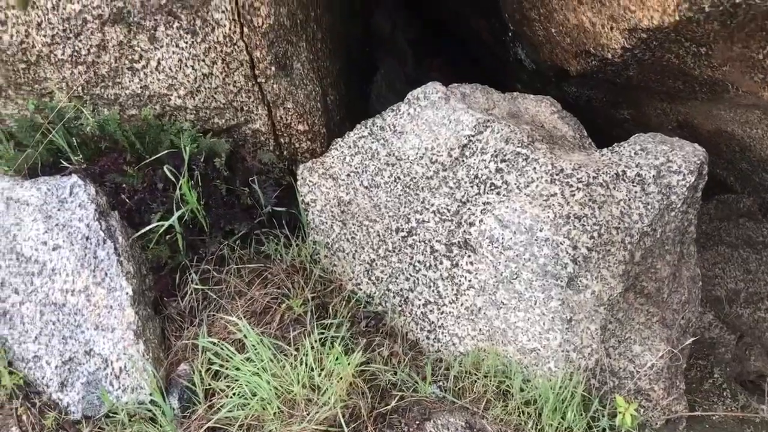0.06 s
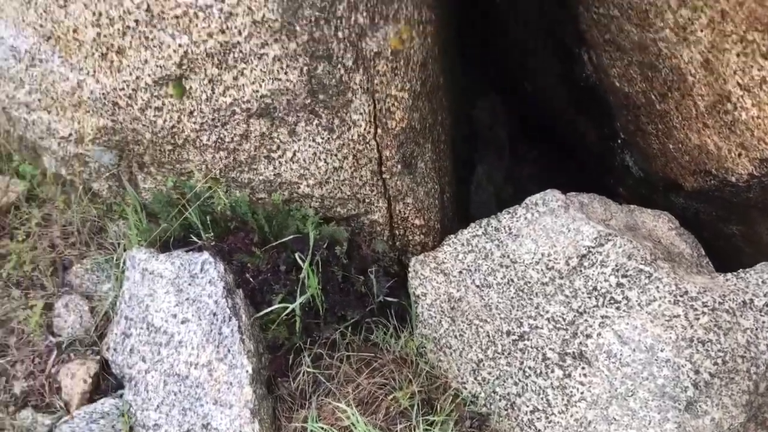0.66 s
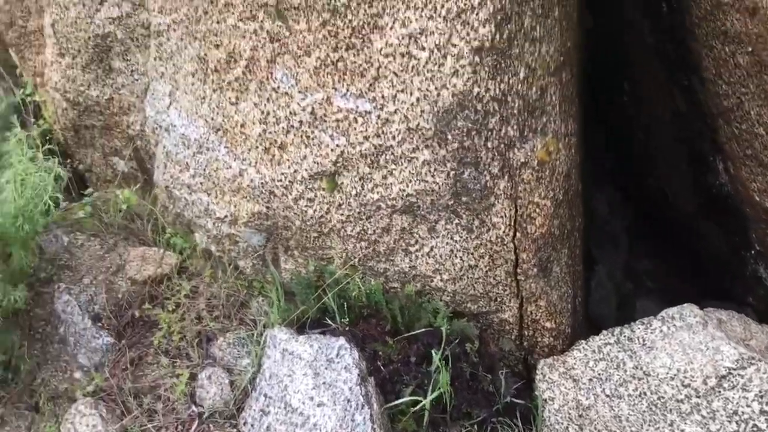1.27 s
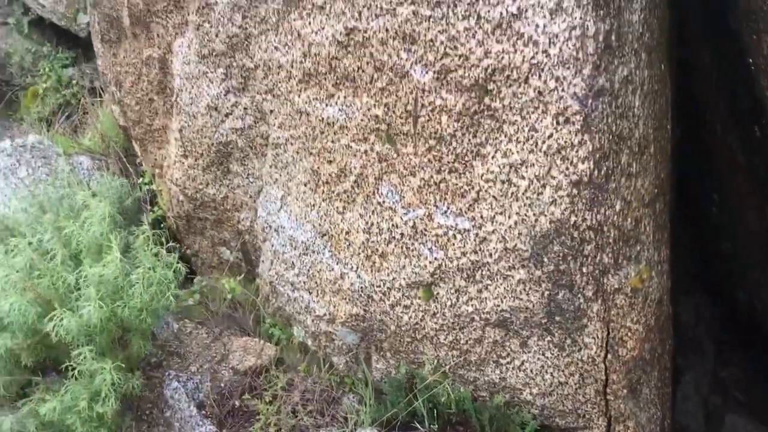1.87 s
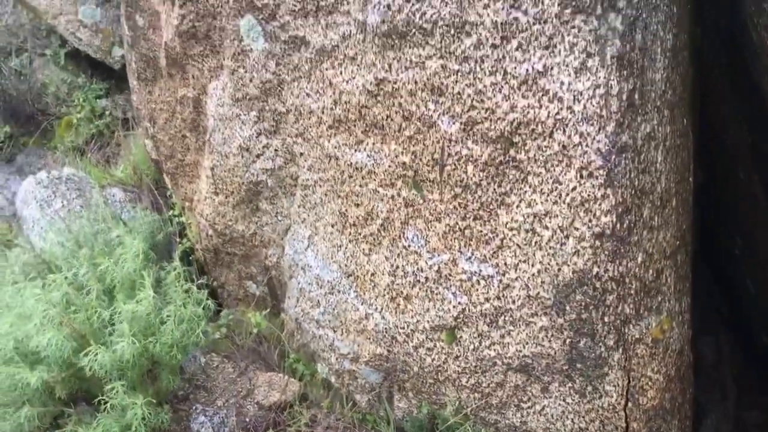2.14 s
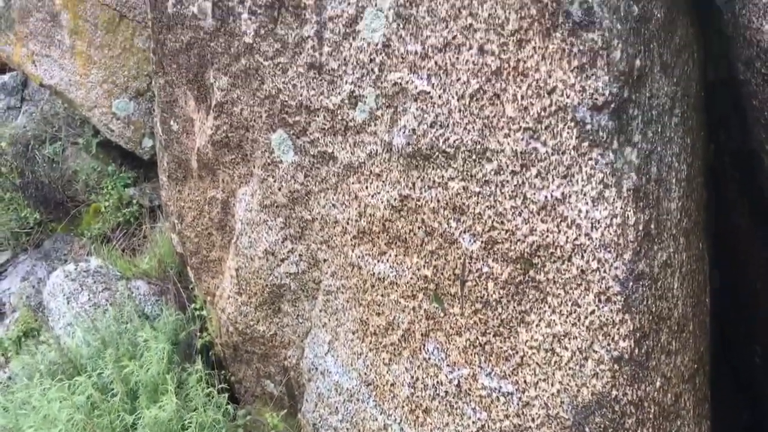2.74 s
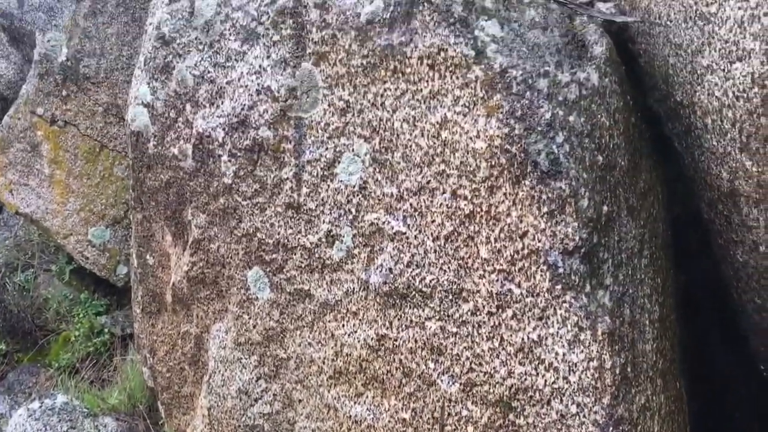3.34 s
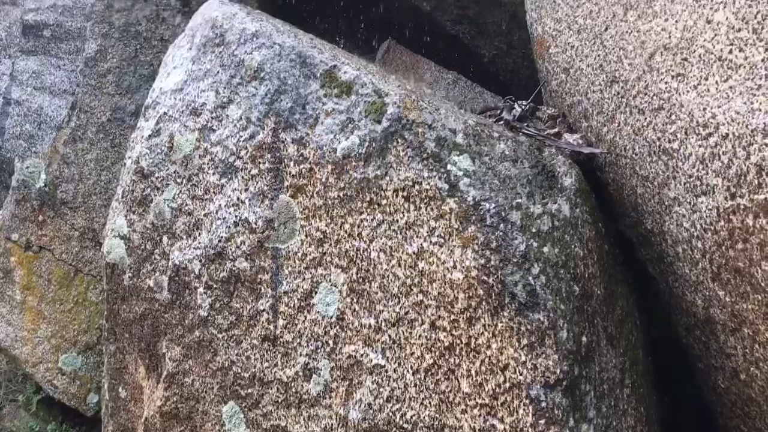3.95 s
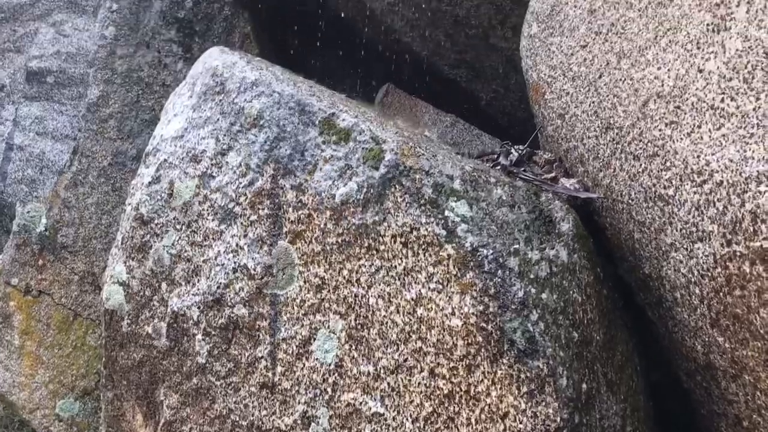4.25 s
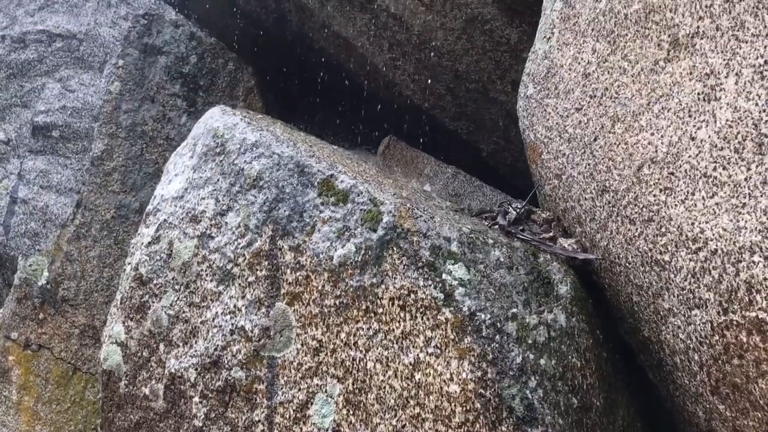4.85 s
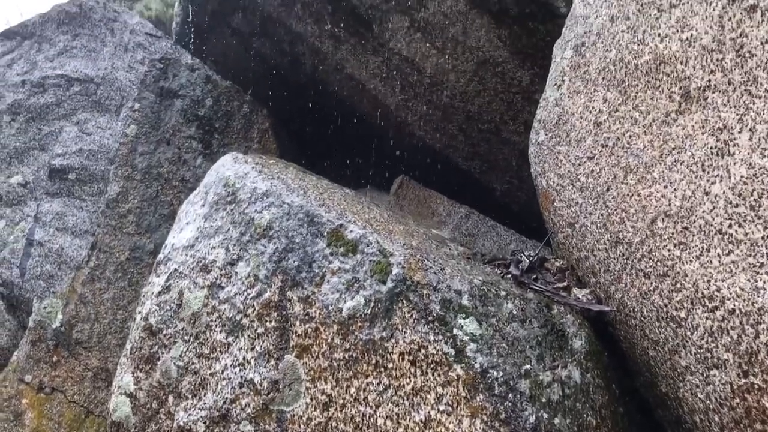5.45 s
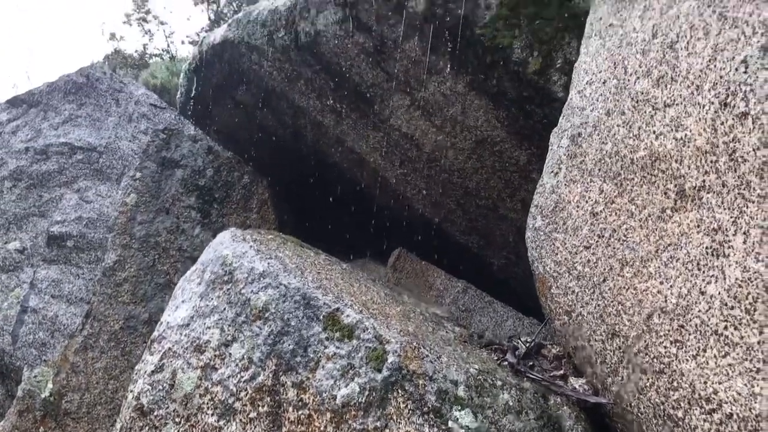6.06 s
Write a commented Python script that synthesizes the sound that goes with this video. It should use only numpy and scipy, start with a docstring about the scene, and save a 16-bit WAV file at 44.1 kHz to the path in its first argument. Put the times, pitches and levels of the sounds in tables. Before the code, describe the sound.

Water drips quickly and unevenly from an overhanging boulder, smacking on rock and wet ground over a fine patter outdoors.

```python
"""Water drips fast and unevenly from an overhanging boulder onto granite and wet ground.
Each near drop is a tiny smack followed by a short spray. Fat drops plop into wet hollows,
duller splatters and soft thuds land on the earth, and one trapped bubble rings.
Countless small drops patter behind them, the rock faces echo faintly, and the outdoor air rumbles low."""
import sys
import numpy as np
from scipy import signal
from scipy.fft import rfft, irfft, next_fast_len
from scipy.io import wavfile

SR = 44100
rng = np.random.default_rng(int(sys.argv[2]) if len(sys.argv) > 2 else 0)


def bounce(signal):
    """Save signal as a 16-bit WAV file at the path given by the first command-line argument."""
    frames = np.transpose(np.atleast_2d(signal))
    limited = np.clip(frames, -1, 1)
    pcm = np.round(limited * 32767).astype(np.int16)
    wavfile.write(sys.argv[1], SR, pcm)


N = 269451

TOUCH_S = 0.0008   # a drop first touches this long before it smacks
# How loud the far patter on rock is. Each row: time in seconds, level in dB.
ROCK_PATTER_LEVELS = [(0.0, -53.5), (0.36, -51), (0.5, -52), (0.75, -48.5), (1.0, -50), (1.15, -49.5),
                      (1.42, -48.5), (1.7, -49), (1.79, -50), (2.09, -47), (2.7, -48), (3.1, -48),
                      (3.95, -47), (4.15, -44.5), (4.44, -49.5), (4.6, -44.5), (4.82, -49.5), (4.98, -44.5),
                      (5.65, -47), (5.9, -48.5), (6.11, -45)]


def rock_drips():
    """Near drops hit the granite with a bright smack and a spray."""
    # Each row: start in seconds, level in dB, pitch in Hz, width in octaves, second pitch in Hz, its level in
    # dB compared with the first, relative spray level in dB. The narrow row at 0.8593 s is the trapped bubble
    # ringing, not a drop on the granite.
    main_drops = [(0.048, -40, 6530.0, 0.68, 14000.0, -3, -2.0),
                  (0.0548, -40, 3300.0, 0.32, 5400.0, -6.0, -12), (0.1884, -34, 6040, 0.3, 4130, -9.0, -5),
                  (0.2673, -41.5, 7770.0, 0.22, 13400.0, 0.0, -12.0),
                  (0.2706, -41, 13380.0, 0.2, 6100.0, -9.0, -11.0),
                  (0.2917, -40, 3880.0, 0.54, 5200.0, -10, -10.0), (0.3506, -39, 4930, 0.67, 5200, 2, -4.0),
                  (0.4144, -34.5, 13170.0, 0.42, 7900.0, -6.0, 0),
                  (0.4301, -40, 2800.0, 0.64, 1810, -12, -13.0),
                  (0.5428, -36.5, 6520.0, 0.2, 13800.0, -8, -11),
                  (0.6055, -34.0, 6700, 0.62, 12300.0, -6, -1),
                  (0.6912, -43, 4490.0, 0.41, 13300.0, -11, -3.0),
                  (0.7312, -37.5, 6900.0, 0.22, 9600.0, -19, -9),
                  (0.7598, -38.0, 12800.0, 0.87, 6200.0, -3.0, -2),
                  (0.8593, -38, 4340, 0.14, 2300.0, -12.0, -12),
                  (0.8732, -40, 8570.0, 0.32, 14000.0, 3, -11),
                  (0.9139, -29, 3750, 0.44, 7700.0, -9.0, -9.0),
                  (1.0489, -34.5, 6100, 0.29, 3700.0, -10.0, -11),
                  (1.0829, -37.0, 6710.0, 0.2, 8500.0, -7, -12.0),
                  (1.1106, -36, 6420.0, 0.22, 2300.0, -7, -8.0),
                  (1.1285, -32, 6700.0, 0.36, 4430, -8.0, -4), (1.1653, -34, 6560.0, 1.97, 7700.0, 1, -14),
                  (1.2328, -38, 5220.0, 0.24, 3800.0, -7, 0.0),
                  (1.2446, -35.5, 6930.0, 0.45, 2200.0, -9.0, 0),
                  (1.3775, -39, 6200, 0.34, 8100.0, -13, -3.0),
                  (1.4867, -36.0, 13500.0, 0.2, 9400.0, -5.0, 1),
                  (1.6491, -30.5, 5930.0, 0.25, 8300.0, -13.0, -9.0),
                  (1.7174, -34.5, 6300, 0.29, 8900.0, -6.0, 0.5),
                  (1.8123, -33.5, 3770, 0.54, 4300.0, -5, -4),
                  (1.8732, -32.5, 11690.0, 0.59, 5900.0, -3, -10),
                  (1.8818, -30.5, 5820.0, 0.42, 8000.0, -8.0, -3),
                  (1.8862, -39, 6040.0, 0.51, 14000.0, -5, -8),
                  (1.9147, -37, 8560.0, 0.51, 4500.0, -6.0, -4),
                  (1.9595, -39.0, 12810.0, 0.43, 8700.0, -9, 0.0), (1.9905, -35, 6900, 0.2, 5300.0, -1, -9),
                  (2.003, -34, 3770, 0.44, 13100.0, -5.0, 0), (2.0727, -29, 3550, 0.51, 6500, -13, -2),
                  (2.1053, -37, 6300, 0.23, 7500.0, -5, -6.0), (2.1103, -30.5, 3000, 0.37, 4600.0, -4, -6),
                  (2.2217, -23.5, 11500, 0.3, 8100.0, -10, -6),
                  (2.2377, -40, 2800.0, 1.3, 11500.0, -10.0, -15),
                  (2.274, -33.5, 7340, 0.41, 8800.0, 1, -12.0),
                  (2.395, -27, 4700, 1.6, 14000.0, -12.0, -11),
                  (2.4285, -32.0, 6240, 0.29, 10100.0, -18, -8.0),
                  (2.4437, -36.0, 9070.0, 0.46, 14000.0, -5.0, -10),
                  (2.475, -26.5, 13400, 0.62, 6600.0, -7, -8), (2.5532, -35, 6380.0, 0.31, 3570, -6.0, -1),
                  (2.5639, -31.5, 6750.0, 2.4, 6300.0, -2, -11),
                  (2.5987, -35.5, 3670.0, 0.52, 13700.0, -3.0, -3.0),
                  (2.6281, -38.0, 13470.0, 0.53, 8300.0, -14, 2),
                  (2.6721, -39, 6670.0, 0.21, 8900.0, -7, -9),
                  (2.7207, -41.0, 12750.0, 0.51, 14000.0, -1.0, -10.0),
                  (2.7618, -35.0, 4920.0, 1.6, 4300.0, -12, 1), (2.8142, -32, 6360.0, 0.37, 4100.0, -9, -4),
                  (2.8182, -33.5, 6000.0, 0.42, 4300.0, -6, -1), (2.8832, -28.0, 5700, 0.73, 6860, 0.0, -4),
                  (2.8927, -34, 7500, 0.2, 6900.0, -8.0, -14.0), (2.9012, -28, 3980, 0.42, 1810, -2, -9),
                  (3.0889, -39, 8220.0, 0.27, 10800.0, -2, -12.0),
                  (3.122, -39, 7730.0, 0.43, 10800.0, -7, -8.0),
                  (3.1681, -34.5, 6060.0, 0.6, 11500.0, -2, -5),
                  (3.3746, -28.0, 5900, 1.1, 12700.0, -7.0, -10),
                  (3.3928, -42, 8420.0, 0.5, 6900.0, -7.0, -2),
                  (3.3978, -24, 9110.0, 1.04, 12300.0, -1, -6),
                  (3.4461, -34.0, 6500, 0.17, 5100.0, -8.0, -6),
                  (3.4752, -40.0, 12110.0, 0.2, 14000.0, 0.0, -14.0),
                  (3.5081, -28, 4230, 1.4, 12000.0, -2, -3), (3.5783, -31.5, 3320, 0.41, 5700.0, -4, -3.0),
                  (3.643, -40, 5460.0, 0.41, 11800.0, -1, -11),
                  (3.6985, -35.0, 7050, 0.5, 9500.0, 0, -10.0), (3.7575, -26, 10200.0, 0.66, 5950, -8, -11),
                  (3.8314, -34.5, 6620.0, 0.93, 12100.0, -4, 0),
                  (3.8378, -36, 3000.0, 0.45, 2000.0, -8.0, -17.0),
                  (3.955, -30, 5700, 4.4, 2760, -10.5, -2.5),
                  (3.9655, -23.5, 7330.0, 0.94, 11700.0, -8, -3),
                  (3.9816, -32.0, 6300, 0.18, 8500.0, -1.0, -12.0),
                  (4.0819, -37.0, 11630.0, 0.21, 8300.0, -5, -9.0),
                  (4.0864, -38, 9120.0, 0.75, 5400.0, -9.0, -5),
                  (4.1001, -27.5, 5750, 1, 4900.0, -1.0, -11.0),
                  (4.1045, -30.5, 5840.0, 1.8, 6800.0, -14, -8),
                  (4.1488, -30.5, 6030.0, 0.43, 12600.0, -5.0, -9.0),
                  (4.1577, -30, 9120.0, 0.54, 5900.0, -6, -10.0),
                  (4.1806, -33.5, 6780.0, 0.2, 6100.0, 0.0, -6.0),
                  (4.2305, -41, 13500.0, 0.51, 5200.0, -5.0, -12.0),
                  (4.2504, -37.0, 4930.0, 0.44, 12100.0, -7.0, 2.5),
                  (4.2966, -35.0, 5020.0, 0.32, 6700.0, -9.0, -10),
                  (4.3413, -36.5, 6090.0, 0.74, 3500.0, -9, 0),
                  (4.3972, -38.0, 10600, 0.38, 14000.0, -9, 2),
                  (4.4639, -31.5, 9100, 0.32, 13400.0, -7.0, -5.0),
                  (4.4694, -34, 7310.0, 0.83, 13400.0, 0.0, -7),
                  (4.4843, -42, 11580.0, 0.2, 13200.0, -1.0, -12.0),
                  (4.5475, -32, 3250.0, 2.4, 5200.0, -2, -2), (4.5506, -30.5, 5300, 0.14, 6200.0, -4, -8),
                  (4.5577, -29, 4530.0, 1.33, 13400.0, 0, -3), (4.5838, -25, 4530, 0.78, 7400.0, 0, -8),
                  (4.5998, -17.0, 5830, 0.38, 8250, -0.5, -10),
                  (4.6039, -32.5, 7610.0, 0.58, 4900.0, -9.0, 5),
                  (4.6277, -30.0, 4980.0, 0.23, 5800.0, -4.0, -8),
                  (4.7024, -27.0, 4850, 0.68, 8000.0, -6.0, -11.0),
                  (4.7156, -17.5, 9050, 0.34, 5600, -6, -10), (4.7198, -35, 9390.0, 0.2, 6800.0, -1.0, 0),
                  (4.7593, -30.5, 4810.0, 0.49, 7400.0, -9.0, -11),
                  (4.8427, -39, 10170.0, 0.44, 13100.0, -6, 5), (4.8733, -39, 7140.0, 1.72, 5230, 0, -3),
                  (4.9763, -30.5, 6000, 0.61, 5960, 2, 0.5),
                  (4.9892, -34.0, 13000, 0.43, 7800.0, -8.0, -5.0),
                  (5.0132, -32.5, 5020.0, 0.52, 3260, -1, -4),
                  (5.0652, -34.0, 13400, 0.46, 5100.0, -11, -12),
                  (5.0845, -30, 5410.0, 0.14, 5400.0, -1, 1), (5.1425, -29, 11900.0, 0.7, 6400.0, -18, -10),
                  (5.1636, -32.0, 6800, 0.17, 9700.0, -5, -22), (5.3013, -28.5, 13500.0, 0.41, 9050, 0, -7),
                  (5.3046, -32.5, 5400, 0.2, 6100.0, -7, -8),
                  (5.3145, -32.0, 5570.0, 0.24, 13100.0, 0.0, -13.0),
                  (5.3754, -26.5, 13410.0, 0.58, 7300.0, -4, -12),
                  (5.4224, -33.0, 13500.0, 0.51, 3300.0, -22, 0),
                  (5.4673, -30, 4430.0, 0.53, 6100.0, -7.0, -4),
                  (5.5116, -30.5, 5300, 0.55, 8900, -9.0, -3), (5.5775, -23.5, 4200, 1.1, 10000.0, -2, -9),
                  (5.6154, -30.5, 6300.0, 0.48, 10300.0, -1, -2),
                  (5.6186, -26, 13040.0, 0.36, 10900.0, -7.0, -16.0),
                  (5.6577, -25.5, 5200.0, 0.48, 3500.0, -12, -5),
                  (5.6656, -29.0, 5220.0, 0.38, 7400.0, -5, -14.0),
                  (5.7027, -18.0, 4350.0, 0.51, 9000, -9.0, -16),
                  (5.7185, -31, 11760.0, 1.09, 5800.0, 1, -5.0),
                  (5.7234, -29, 7650.0, 2.4, 14000.0, 0.0, 0.0),
                  (5.7449, -22.5, 5140.0, 0.63, 8900, 1, -11),
                  (5.7707, -33, 5450.0, 0.25, 14000.0, -9, -14.0),
                  (5.7883, -32.5, 7030.0, 0.63, 10600.0, -6.0, -12.0),
                  (5.8004, -33.0, 13220.0, 0.49, 5570, -1.0, -15.0),
                  (5.8164, -25.5, 4070, 0.46, 11100.0, -10, -9.0),
                  (5.9536, -36, 13250.0, 0.54, 9300.0, -7, -12.0),
                  (5.9716, -33.5, 4230.0, 0.51, 7100.0, -11, -6),
                  (5.98, -31.5, 5210.0, 0.57, 10900.0, 0, -1.5),
                  (6.0016, -30.5, 4820.0, 0.37, 11400.0, -14.0, -9.0),
                  (6.0209, -32.0, 4130, 0.22, 6600.0, 2, -5), (6.0506, -34.5, 5500, 0.23, 4700.0, -1, -6.0),
                  (6.0659, -32, 13500.0, 2, 11400.0, -1, -9.0)]
    return drips([*main_drops, *light_drops(per_s=9)], smack_db=0.0, spray_db=0.5, spray_per_s=3500,
                 spray_fade_s=0.17, crack_db=-7.5, crack_ratio=1.1, crack_octaves=2.56)


def light_drops(per_s):
    """Random rows like main_drops: lighter drops, alike but for their size and where they land."""
    count = int(per_s * N / SR)
    starts = (np.arange(count) + rng.random(count)) / count * N / SR
    strength, pitch, width, second_pitch, wetness = np.clip(rng.standard_normal((count, 5)), -2, 2).T
    db = np.interp(starts, *np.transpose(ROCK_PATTER_LEVELS)) + 4.5 + 0.5 * strength
    hz, second_hz = 9140 * 2 ** (0.32 * np.array([pitch, second_pitch]))
    octaves = 0.46 * 2 ** (0.62 * width)
    second_db, wet_db = np.full(count, -2), 1 + 1.4 * wetness
    return np.transpose([starts, db, hz, octaves, second_hz, second_db, wet_db])


def plops():
    """Fat drops fall into wet hollows, sounding a lower note and a splash."""
    # Each row: start in seconds, relative level in dB, pitch in Hz, width in octaves, higher pitch
    # in Hz, its level in dB compared with the first, relative splash level in dB.
    fat_drops = [(0.1446, -31, 2750, 0.37, 5930, -9, -7), (0.8429, -35.5, 1740, 0.53, 2290, -9, -2.5),
                 (0.8549, -37, 1400, 1.8, 2000, -12, -12), (1.3912, -30, 1850, 1.2, 3860, -6, -8),
                 (2.5399, -23, 3000, 0.46, 5230, -1.5, -8.5), (2.7371, -22.5, 2780, 0.49, 3800, -10, -7.5),
                 (2.8984, -26.5, 1730, 0.58, 4400, -15, -7), (5.1094, -24, 1680, 0.58, 3430, -5.5, -11.5)]
    return drips(fat_drops, smack_db=-0.5, spray_db=3.0, spray_per_s=3000,
                 spray_fade_s=0.14, crack_db=-6.0, crack_ratio=0.85, crack_octaves=1.86)


def drips(rows, smack_db, spray_db, spray_per_s, spray_fade_s, **crack):
    """Each drop smacks down and echoes off the ground; its spray rains back as tiny impacts."""
    out, t = np.zeros(N), np.arange(SR // 8) / SR
    for lands_s, db, hz, octaves, second_hz, second_db, wet_db in rows:
        start = lands_s - TOUCH_S - 0.0001
        hit = smack(hz, octaves, second_hz, second_db, size=512, **crack)
        shower = droplets(spray_per_s, spread_db=2.0, size=len(t))
        shower *= fade(t, spray_fade_s) * (1 - np.exp(-t / 0.00042))
        echo_s = 0.0036 * (1 + 0.12 * rng.uniform(-1, 1))   # varies from spot to spot
        add(out, start, from_db(db + smack_db) * hit)
        add(out, start + echo_s, from_db(db - 17.5) * hit)
        # Most of the spray rings like its drop; some is scattered in pitch.
        alike = unit_energy(signal.fftconvolve(shower, hit))[:len(t)]
        scattered = from_db(-6.0) * unit_energy(band(shower, hz, octaves + 0.63))
        add(out, start, from_db(db + wet_db + spray_db) * unit_energy(alike + scattered))
    return over_one_ms(out)


def smack(hz, octaves, second_hz, second_db, crack_db, crack_ratio, crack_octaves, size):
    """One impact: a light touch, a brief ring pitched by the drop's size, a second ring and a crack."""
    at = int(TOUCH_S * SR)
    t = (np.arange(size) - at) / SR
    click = signal.unit_impulse(size, at)
    # The rim of the drop slaps down again a moment later.
    rebound_s = 0.0012 * rng.uniform(.5, 1.5)
    click[at + int(rebound_s * SR)] += from_db(-11) * rng.choice([-1, 1])
    # The drop tears within a millisecond, which gives each its own tone.
    noise = rng.standard_normal((3, size))
    tearing = noise[:2] * np.exp(-abs(t) / 0.001) * (t > 0)
    touch = from_db(-12) * unit_energy(noise[2] * (t < 0))
    push = click + from_db(-12.5) * unit_energy(tearing[0]) + touch
    ring = unit_energy(band(push, hz, octaves, order=3))
    second = from_db(second_db) * unit_energy(band(push, second_hz, 0.39)) * rng.choice([-1, 1])
    crack = from_db(crack_db) * unit_energy(band(tearing[1], crack_ratio * hz, crack_octaves))
    return unit_energy(flatten_drop(ring + second + crack, width_hz=7000))


def flatten_drop(x, width_hz):
    """A drop flattens over a fraction of a millisecond, so some pitches arrive a little late."""
    r = np.exp(-np.pi * width_hz / SR)
    for hz in np.array([4500, 7500, 12000]) * rng.uniform(.8, 1.2, 3):
        poles = np.array([1, -2 * r * np.cos(2 * np.pi * hz / SR), r * r])
        x = signal.lfilter(poles[::-1], poles, x)   # changes timing, not loudness
    return x


def splats(gain_db, octaves):
    """Water breaks up on gritty ground in short, dull clusters of tiny hollow pops; one brief cluster at 1.52 s
    is a fat drop plopping into a hollow."""
    # Each row: start in seconds, level in dB before gain_db, middle pitch in Hz, fade time in seconds. The row
    # at 1.521 s is a fat drop plopping into a wet hollow, played as a short cluster.
    splatters = [(0.274, -51, 3200, 0.016), (0.314, -51, 1600, 0.012), (0.433, -56, 1700, 0.031),
                 (0.852, -41, 1430, 0.0063), (0.896, -53, 1600, 0.015), (1.1285, -48, 1800, 0.003),
                 (1.239, -50.5, 1860, 0.022), (1.291, -53, 1390, 0.0098), (1.354, -54, 1690, 0.0099),
                 (1.402, -51, 2550, 0.0092), (1.451, -48, 1450, 0.0044), (1.464, -48.5, 2050, 0.014),
                 (1.493, -47.5, 1710, 0.011), (1.521, -41, 1650, 0.0027), (1.556, -47, 2100, 0.0064),
                 (1.567, -47, 1790, 0.016), (1.581, -46, 1600, 0.0097), (1.701, -50.5, 2290, 0.012),
                 (1.727, -55, 1850, 0.021), (1.843, -50, 1570, 0.0096), (1.86, -47, 1760, 0.0066),
                 (1.89, -48, 2700, 0.0088), (1.909, -49, 1670, 0.0055), (1.945, -47, 1820, 0.0032),
                 (1.969, -51, 1760, 0.0058), (2.088, -48, 3030, 0.015), (2.115, -48, 2380, 0.013),
                 (2.129, -45.5, 1360, 0.015), (5.09, -49.5, 1040, 0.0054), (5.421, -50.5, 860, 0.0081)]
    out, t = np.zeros(N), np.arange(SR // 12) / SR
    for start, db, hz, length in splatters:
        pitches = hz * 2 ** (octaves * (np.linspace(-.5, .5, 7) + rng.uniform(-.06, .06, 7)))
        pops = ringing_droplets(pitches, per_s=600, spread_db=5.0, cycles=16, size=len(t))
        cluster = band(pops, hz, octaves + 1)
        shape = np.exp(-(t / length) ** 2 / 2)
        add(out, start, from_db(db + gain_db) * unit_energy(cluster * shape) * np.linalg.norm(shape))
    return out


def thuds(gain_db, settle_s):
    """Heavy, soft impacts push the air for a cycle or two, then the wet ground settles."""
    # Each row: start in seconds, level in dB before gain_db, middle pitch in Hz, width in octaves,
    # energy of the settling in dB compared with the push.
    impacts = [(0.4302, -39, 850, 1.9, -9), (1.44, -44.5, 300, 1.1, -9), (1.591, -54, 110, 1.9, -9),
               (2.143, -45, 174, 0.8, 1), (2.238, -39.5, 850, 1.5, -20), (2.809, -47, 48, 0.75, -5),
               (2.858, -48, 47.3, 0.8, 3), (3.839, -43.5, 600, 4.2, -16), (4.55, -40.5, 750, 2.4, -1),
               (5.13, -45.5, 110, 2.2, 8), (5.428, -44.5, 200, 2, 2), (5.524, -43, 138, 2.1, 3),
               (6.043, -42, 180, 1.2, -9), (6.0703, -27, 228, 1.65, -13)]
    out, t = np.zeros(N), np.arange(SR // 10) / SR
    for start, db, hz, octaves, settle_db in impacts:
        push = unit_energy(band(signal.unit_impulse(len(t)), hz, octaves))
        noise = rng.standard_normal(len(t)) * fade(t, settle_s)
        settling = from_db(settle_db) * unit_energy(band(noise, hz, octaves))
        add(out, start, from_db(db + gain_db) * (push + settling))
    return over_one_ms(out)


def bubble():
    """Air caught in a puddle rings as a pure, dying note."""
    # Each row: start in seconds, peak level in dB, pitch in Hz, seconds to fade by 60 dB.
    notes = [(0.846, -39.5, 4430, 0.096)]
    out, t = np.zeros(N), np.arange(SR // 10) / SR
    for start, db, hz, fade_s in notes:
        add(out, start, from_db(db) * fade(t, fade_s) * np.sin(2 * np.pi * hz * t))
    return out


def rock_echo(x, db, fade_s):
    """The rock faces scatter the sound back as a thin, short echo."""
    t = np.arange(SR // 2) / SR
    tail = rng.standard_normal(len(t)) * fade(t, fade_s) * (1 - np.exp(-t / 0.002))
    return signal.fftconvolve(x, from_db(db) * unit_energy(tail))[:N]


def patter():
    """Small drops tick on rock and tap on earth, bunching and thinning; the farthest merge into hiss."""
    # The tone of drops on rock and on earth. Each row: frequency in Hz, relative level in dB.
    rock_tone = [(1760, -81), (3000, -6), (3400, -2), (4830, -1.5), (5330, 4), (6260, 5), (8400, 3),
                 (10400, 3.5), (11500, 4), (15100, 3), (16000, -1)]
    earth_tone = [(500, 2), (900, -3), (1500, 3.5), (2200, 2), (3200, -1), (5000, -0.5)]
    # How loud the patter on earth is. Each row: time in seconds, level in dB.
    earth_levels = [(0.0, -66.5), (0.1, -58.5), (0.29, -55.5), (0.47, -57), (0.62, -60), (0.78, -54.5),
                    (0.88, -54), (0.98, -57.5), (1.08, -55), (1.25, -55.5), (1.5, -48), (1.63, -57),
                    (1.72, -51.5), (1.79, -58.5), (1.9, -52.5), (2.52, -60), (3.18, -57.5), (3.4, -56),
                    (3.8, -57.5), (4.2, -59.5), (4.53, -60), (5.16, -57), (5.96, -60), (6.11, -58)]
    ticks = ringing_droplets(np.geomspace(3800, 15500, 36), per_s=380, spread_db=5.5, cycles=25, size=N)
    rock_hiss = from_db(-3.0) * with_tone(rng.standard_normal(N), rock_tone)
    rock = from_db(-5.0) * with_tone(ticks, rock_tone) + rock_hiss
    taps = ringing_droplets(np.geomspace(900, 3600, 24), per_s=380, spread_db=4.5, cycles=78, size=N)
    earth_hiss = from_db(-1.2) * with_tone(rng.standard_normal(N), earth_tone)
    earth = from_db(-4.0) * with_tone(taps, earth_tone) + earth_hiss
    rock *= gain_curve(ROCK_PATTER_LEVELS) * wander(rate_hz=29.0, depth_db=2.22)
    earth *= gain_curve(earth_levels) * wander(rate_hz=2.5, depth_db=1.7)
    return rock + earth


def turn_to_water(x, above_hz, away_db, turn_s):
    """The highest ticks start dull and brighten as the microphone swings round to the water."""
    treble = signal.sosfiltfilt(signal.butter(2, above_hz, "high", fs=SR, output="sos"), x)
    away = np.clip(1 - np.arange(N) / SR / turn_s, 0, 1)
    return x + (from_db(away_db * away) - 1) * treble


def air(rumble_db, hollow_hz, thin_hz):
    """The outdoor air rumbles low; a faint hollow note and a thin ring come and go."""
    # The tone of the rumble. Each row: frequency in Hz, relative level in dB.
    rumble_tone = [(13, -40), (22, -14), (38, -0.5), (54, 3.5), (114, 2), (173, -1), (317, -1), (415, -5),
                   (545, -7.5), (775, -9.5), (1000, -10.5), (1300, -14.5), (2200, -120)]
    # How the three sounds swell and fade. Each row: time in seconds, relative level in dB.
    rumble_levels = [(0.0, -64), (0.39, -60.5), (0.56, -61.5), (1.1, -59.5), (1.55, -59.5), (1.78, -58),
                     (2.31, -59), (3.0, -59.5), (3.6, -60.5), (4.2, -58), (4.78, -60.5), (5.33, -57),
                     (5.72, -57), (6.11, -55.5)]
    hollow_levels = [(0.0, -81), (0.2, -66), (0.36, -58.5), (0.56, -73), (1.2, -74), (1.55, -63.5),
                     (2.3, -73), (3.8, -72.5), (3.94, -60), (4.03, -69), (6.11, -77)]
    thin_levels = [(0.0, -80), (0.1, -60), (0.42, -73), (0.6, -78), (0.85, -62), (1.0, -78), (1.3, -95)]
    rumble = with_tone(rng.standard_normal(N), rumble_tone) * wander(rate_hz=2.0, depth_db=2.0)
    hollow = gain_curve(hollow_levels) * rms_one(band(rng.standard_normal(N), hollow_hz, 0.41))
    thin = gain_curve(thin_levels) * rms_one(band(rng.standard_normal(N), thin_hz, 0.058))
    return from_db(rumble_db) * gain_curve(rumble_levels) * rumble + hollow + thin


def droplets(per_s, spread_db, size):
    """Tiny impacts at random times: many weak, a few strong."""
    chance, strength, sign = rng.random((3, size))
    excess = np.minimum(-np.log(1 - strength), 3)
    return (chance < per_s / SR) * from_db(spread_db * excess) * np.sign(sign - .5)


def ringing_droplets(pitches, per_s, spread_db, cycles, size):
    """Random droplets each ring at one of the pitches, fading by 60 dB over the given cycles."""
    out = np.zeros(size)
    for hz in np.minimum(pitches, .45 * SR):
        r, angle = from_db(-60 * hz / (cycles * SR)), 2 * np.pi * hz / SR
        hits = droplets(per_s / len(pitches), spread_db, size)
        poles = [1, -2 * r * np.cos(angle), r * r]
        out += signal.lfilter(np.sqrt(1 - r) * np.array([1, 0, -1]), poles, hits + 1e-18)
    return rms_one(out)


def wander(rate_hz, depth_db):
    """A gain that drifts up and down by chance."""
    r = np.exp(-2 * np.pi * rate_hz / SR)
    slow = signal.lfilter([1], [1, -2 * r, r * r], rng.standard_normal(N + SR))[SR:]
    return from_db(depth_db * rms_one(slow))


def band(x, hz, octaves, order=2):
    """Keep only the pitches in a band around hz."""
    half = 2 ** (max(octaves, .04) / 2)
    high = min(hz * half, .45 * SR)
    low = min(hz / half, .9 * high)
    return signal.sosfilt(signal.butter(order, [low, high], "band", fs=SR, output="sos"), x + 1e-18)


def with_tone(x, tone):
    """Shape a steady sound by rows of Hz and dB, at an average level of 1."""
    hz, db = np.transpose(tone)
    size = next_fast_len(N)
    bins = np.maximum(np.fft.rfftfreq(size, 1 / SR), 1)
    gain = from_db(np.interp(np.log(bins), np.log(hz), db, left=-80, right=-80))
    return rms_one(irfft(rfft(x, size) * gain, size)[:N])


def gain_curve(rows):
    """Join rows of seconds and dB into a gain for every sample."""
    return from_db(np.interp(np.arange(N) / SR, *np.transpose(rows)))


def fade(t, seconds):
    """A gain that falls by 60 dB in the given time."""
    return from_db(-60 * t / seconds)


def from_db(db):
    """Turn decibels into a gain, a number to multiply a sound by."""
    return 10 ** (np.asarray(db) / 20)


def rms_one(x):
    """Scale to an average (root mean square) level of 1."""
    return x / np.sqrt(np.mean(x ** 2) + 1e-20)


def unit_energy(x):
    """Scale so the squared samples add up to 1."""
    return x / np.sqrt(np.sum(x ** 2) + 1e-20)


def over_one_ms(x):
    """Scale so an energy of 1 becomes an average level of 1 over a millisecond."""
    return x * np.sqrt(SR / 1000)


def add(out, start_s, sound):
    """Mix a sound in at the given time."""
    at = int(np.clip(round(start_s * SR), 0, N - 1))
    out[at:at + len(sound)] += sound[:N - at]


def scene():
    """Near water and its echo, over far patter and low air."""
    far = turn_to_water(patter(), above_hz=7900, away_db=-5.5, turn_s=2.4)
    low = thuds(gain_db=4.5, settle_s=0.091) + air(rumble_db=1.0, hollow_hz=335.4, thin_hz=1415)
    near = splats(gain_db=4.0, octaves=1.44) + plops() + rock_drips()
    return (near + rock_echo(near, db=-17.5, fade_s=0.31) + bubble() + far + low)[None]


def record(dry):
    """The microphone has a shallow dip in the treble; everything above 16000 Hz is cut."""
    dipped = dry - 0.4 * band(dry, hz=10400, octaves=0.15, order=1)
    return signal.sosfilt(signal.ellip(10, .2, 75, 16000, fs=SR, output="sos"), dipped)


dry = scene()
out = record(dry)
bounce(out)
```